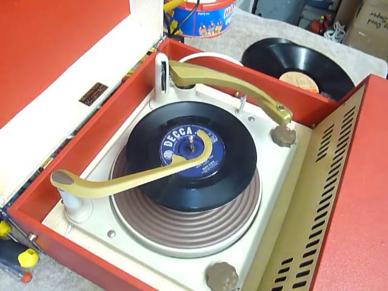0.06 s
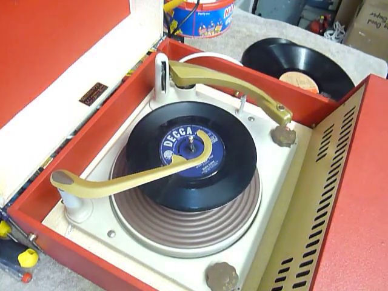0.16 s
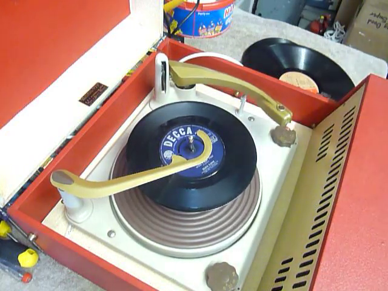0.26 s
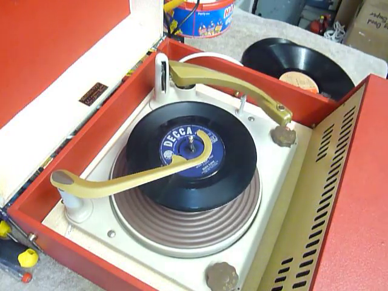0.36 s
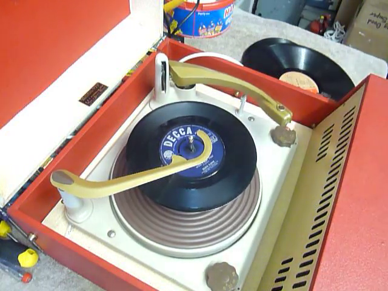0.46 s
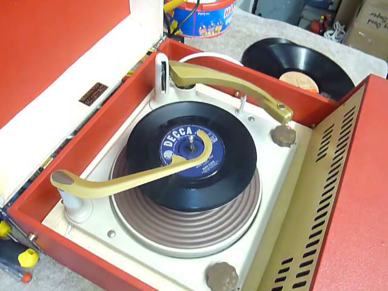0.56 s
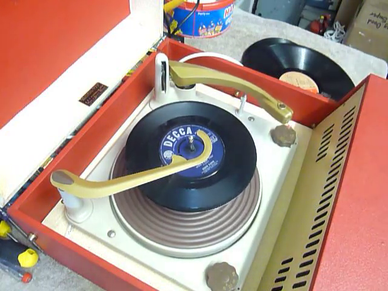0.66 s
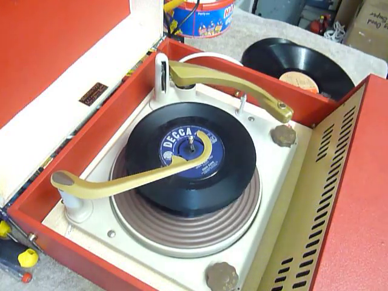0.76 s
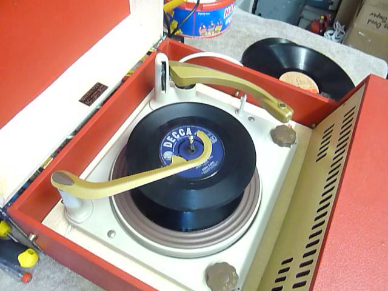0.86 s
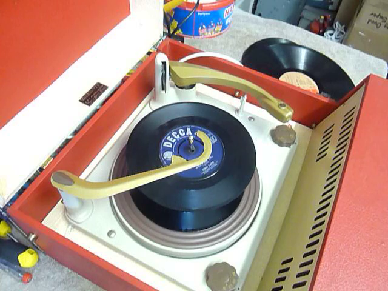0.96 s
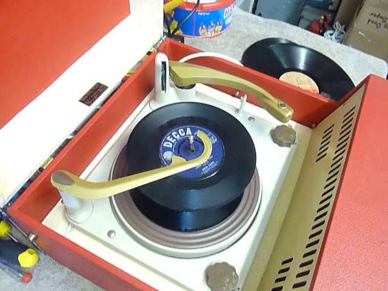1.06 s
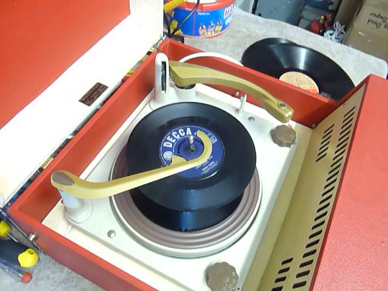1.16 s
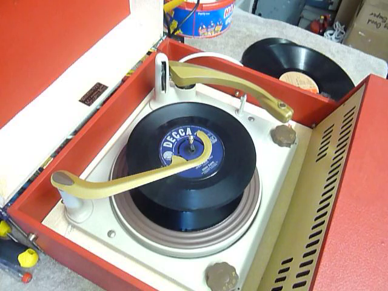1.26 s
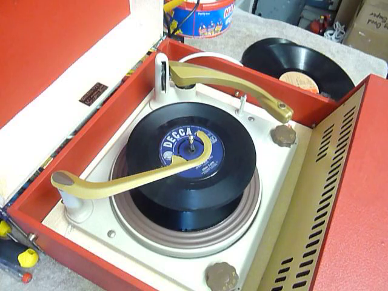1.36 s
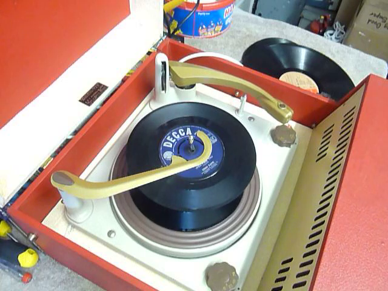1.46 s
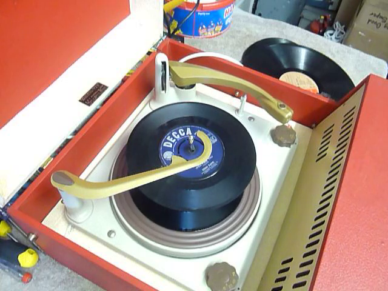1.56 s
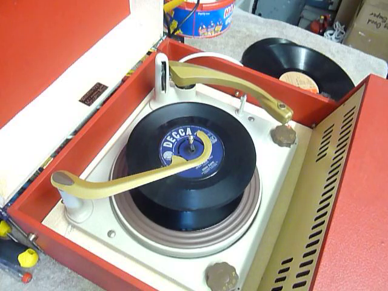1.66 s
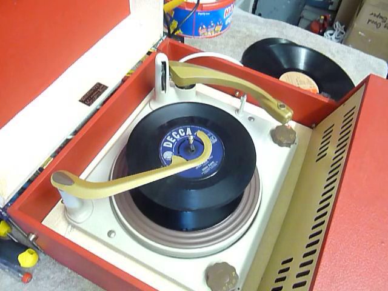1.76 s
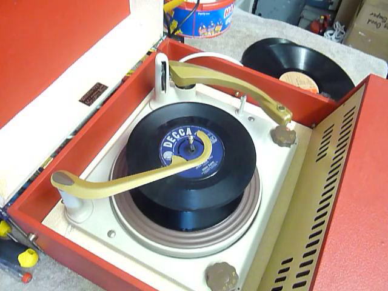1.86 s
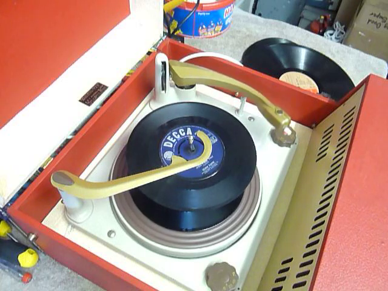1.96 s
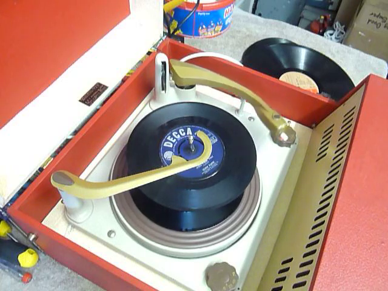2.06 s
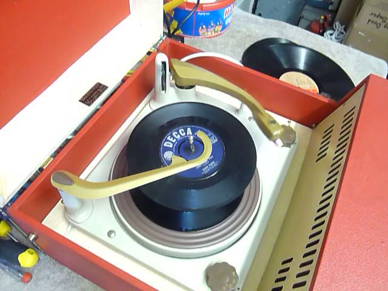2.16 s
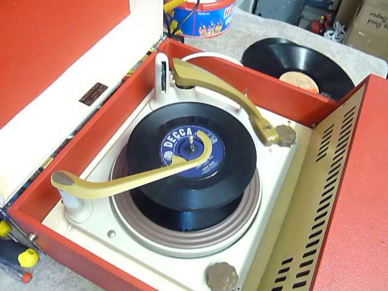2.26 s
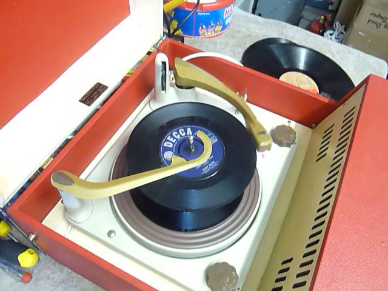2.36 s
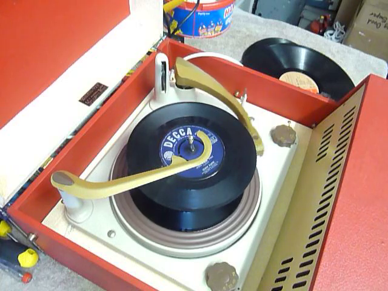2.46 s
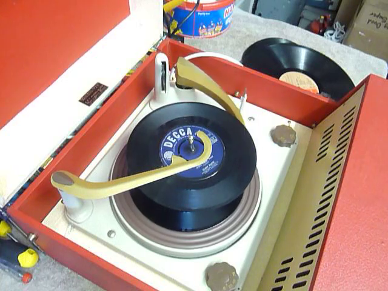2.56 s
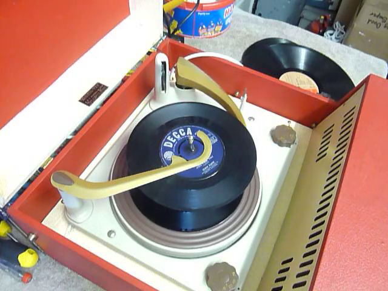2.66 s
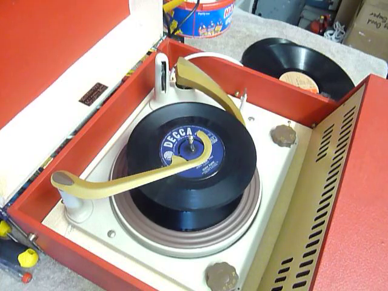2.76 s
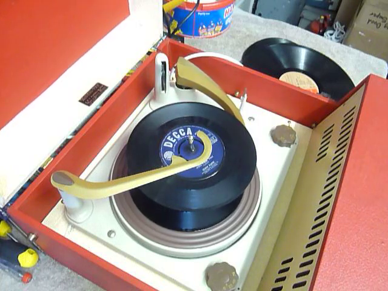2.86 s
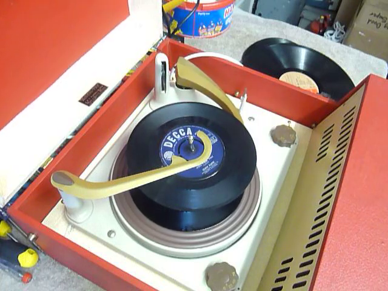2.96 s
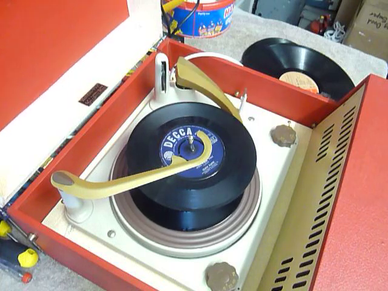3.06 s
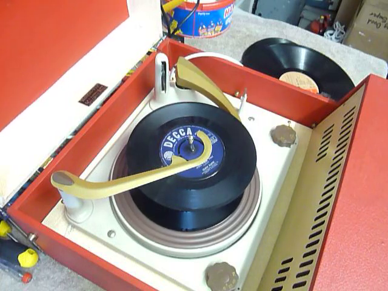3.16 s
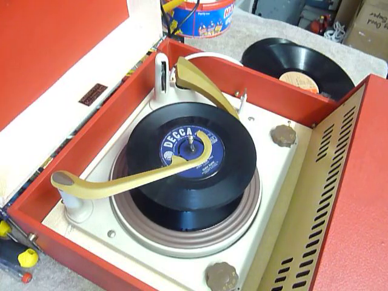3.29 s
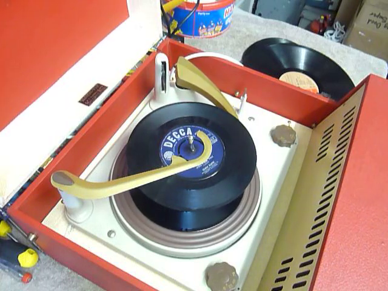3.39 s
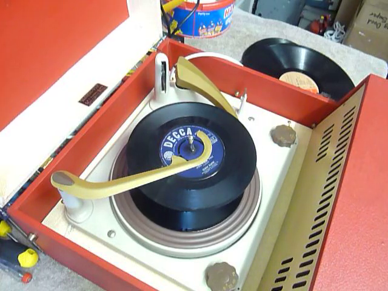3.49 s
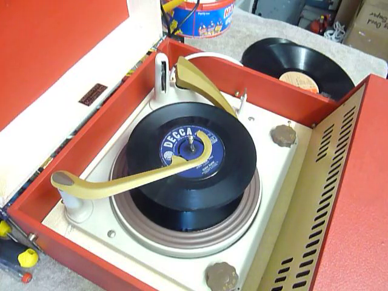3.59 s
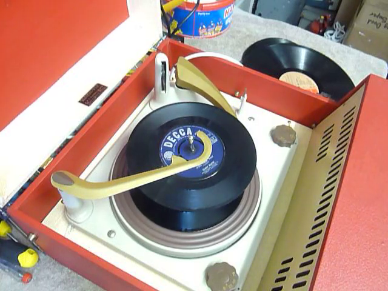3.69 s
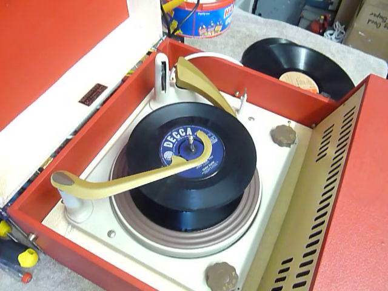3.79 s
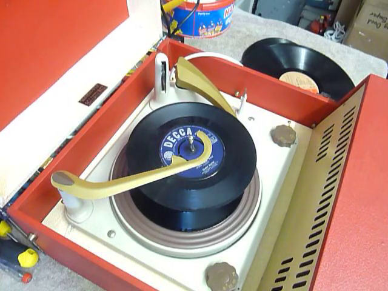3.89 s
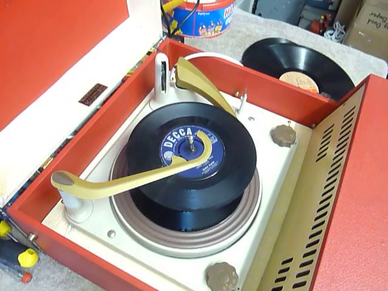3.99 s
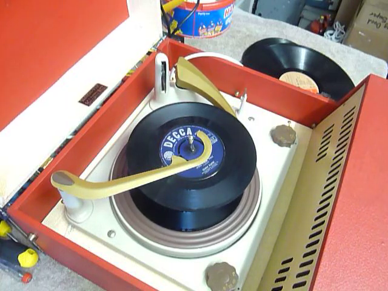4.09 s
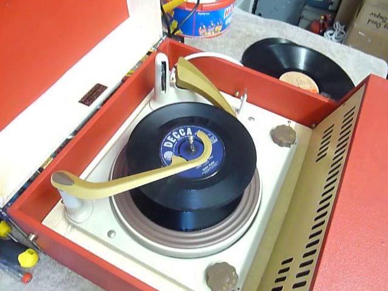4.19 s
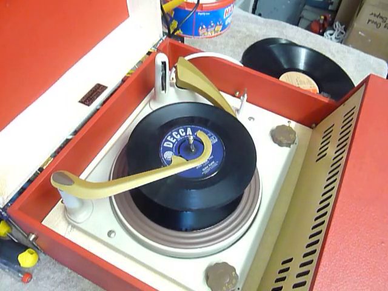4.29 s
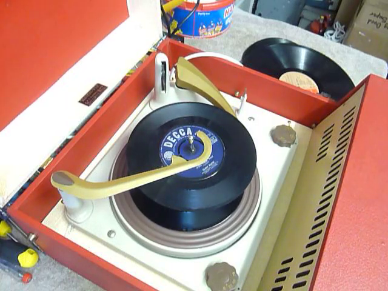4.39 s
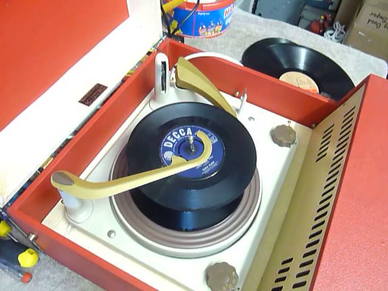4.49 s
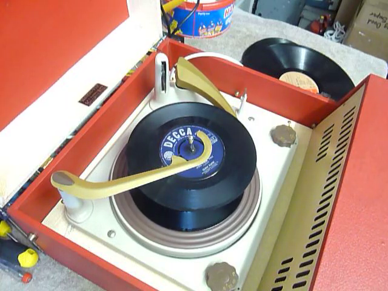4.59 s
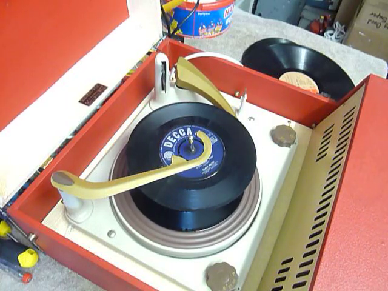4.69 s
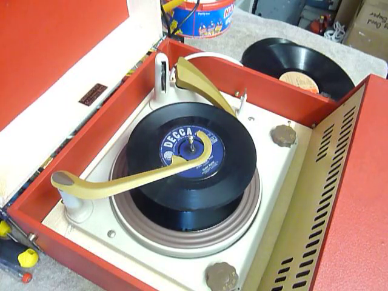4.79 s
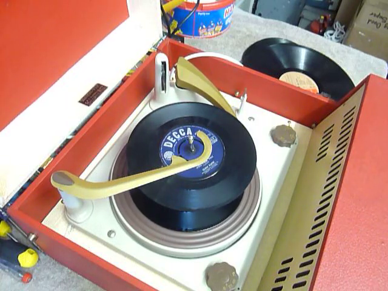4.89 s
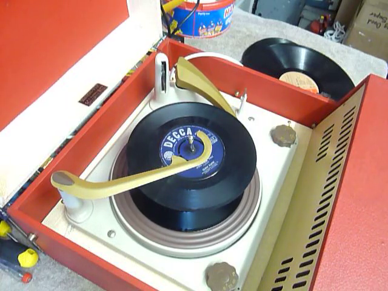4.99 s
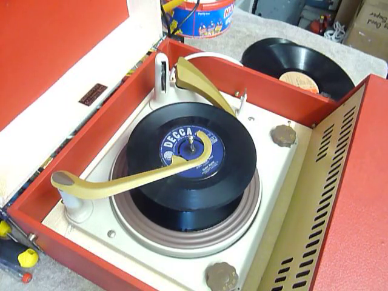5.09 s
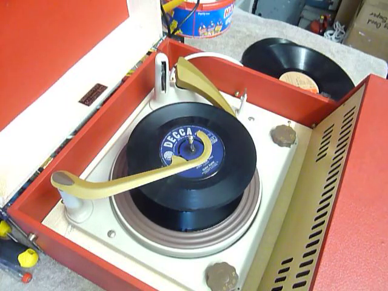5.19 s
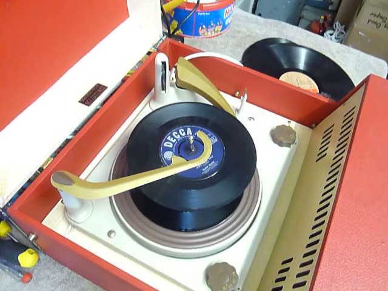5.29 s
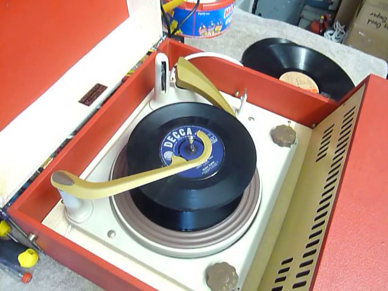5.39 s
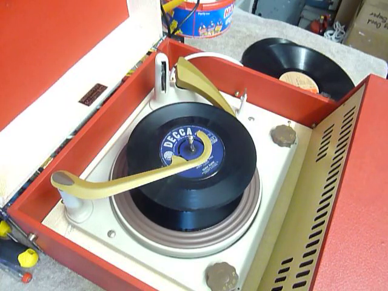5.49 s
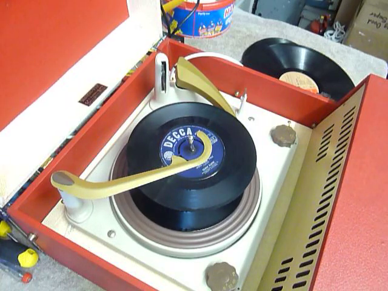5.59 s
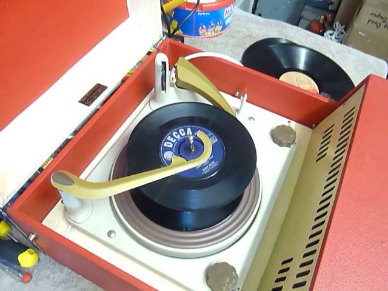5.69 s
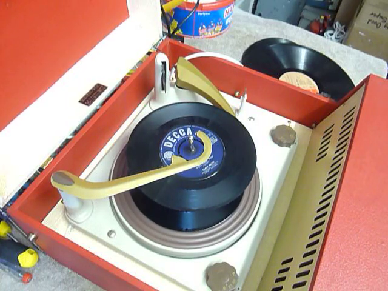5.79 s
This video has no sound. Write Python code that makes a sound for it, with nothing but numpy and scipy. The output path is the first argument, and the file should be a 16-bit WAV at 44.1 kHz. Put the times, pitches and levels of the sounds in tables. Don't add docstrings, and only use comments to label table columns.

```python
import sys
import numpy as np
from scipy import signal
from scipy.fft import rfft, irfft
from scipy.io import wavfile
from scipy.ndimage import uniform_filter1d

SR = 44100
rng = np.random.default_rng(int(sys.argv[2]) if len(sys.argv) > 2 else 0)


def inscribe(sig):
    pcm = np.round(np.clip(np.atleast_2d(sig).T, -1, 1) * 32767)
    wavfile.write(sys.argv[1], SR, pcm.astype(np.int16))


def voltage_ratio(level):
    return 10 ** (np.asarray(level, float) / 20)


N = 257984
SPAN = 8192

# pitch_hz, level_db
FLOOR_SPECTRUM = [(15, -40.5), (45, -25.5), (100, -18), (243, -16.5), (700, -26), (2000, -33),
                  (6500, -40.5), (9000, -30)]
FLOOR_RMS_DB = -54.5
# time_s, rise_db
CAM_LOAD = [(0, 4.5), (.4, 6), (.9, 4.5), (1.2, 3.5), (1.6, 5), (2.4, 4), (3.9, 5), (4.3, 3.3), (5.85, 3.8)]
# multiple of the mains, rms_db
HUM_PARTIALS = [(2, -69), (3, -57), (4, -64), (6, -71.5)]
MAINS_HZ = 49.86
# start_s, step_db
DIAPHRAGM_JOLTS = [
    (.871, -45),
    (2.081, -27),
]

# pitch_hz, level_db, t60_s
GEAR_TONES = [(920, 2, 0.039), (1120, -5, .018), (1170, 5, 0.037), (1450, -11, .014)]
FIRST_TOOTH_S, TOOTH_PERIOD_S, TEETH = 2.859, .0447, 13
HEAVIEST_DB, HEAVIEST_S, EASING_DB_PER_S = -41.5, 3.16, 16
# start_s, peak_db
PAWL_CATCHES = [
    (3.425, -38.5),
    (3.496, -48),
    (3.52, -42.5),
    (3.587, -45.5),
    (3.619, -49),
    (3.657, -48),
    (3.706, -47),
]

# start_s, peak_db, pitch_hz
PANEL_RINGS = [(.097, -42.5, 932), (.158, -40, 350), (.182, -36.5, 338), (.241, -27.5, 940),
               (.463, -33.5, 892), (.543, -25.5, 910), (.771, -40, 523), (.872, -36, 740),
               (.873, -31.5, 367), (1.700, -36, 1450), (1.701, -38.5, 350), (1.826, -37, 346),
               (2.081, -24, 830), (2.082, -29, 371), (2.744, -49, 800), (2.745, -41, 320),
               (2.776, -41, 860), (.768, -33.5, 1235), (1.826, -35.5, 1175), (2.743, -29.5, 1185),
               (2.775, -34, 1170), (4.199, -37, 1182), (1.642, -41, 1210), (3.854, -41.5, 864),
               (4.201, -37, 335), (5.467, -40, 896)]
# start_s, peak_db, pitch_hz
LEVER_RINGS = [(.151, -42.5, 4230), (.216, -54, 2880), (.228, -50, 3000), (.241, -23.5, 2980),
               (.256, -36, 2820), (.293, -47, 3430), (.340, -42, 2930), (.613, -30, 2900),
               (.655, -48, 2880), (.745, -41, 3320), (.771, -39, 2560), (.872, -18, 2000),
               (2.724, -58, 2270), (3.857, -46, 2340), (4.200, -45, 3070), (4.200, -49, 4140),
               (.152, -48, 5960), (.754, -34, 8000), (.772, -47, 5000), (.872, -23.5, 5640),
               (2.120, -43, 4660), (3.856, -42, 5950)]
# start_s, peak_db
DECK_RINGS = [
    (.280, -36),
    (0.342, -39.5),
    (.560, -37),
    (.611, -31.5),
    (0.657, -40.5),
    (.292, -42),
    (.625, -36),
    (2.082, -28),
    (2.797, -45.5),
]
DECK_HZ, DECK_T60_S = 1182, .1
PANEL_T60_S, PANEL_DAMP, LEVER_T60_S, LEVER_DAMP = 0.084, .1, 0.057, 0.36
ENGAGED_S, ENGAGED_SHARE = 1.2, .65

# low_hz, high_hz, ring_s, tail_db, tail_t60_s
CROWDED_BODIES = [
    (715, 2235, 0.0044, -9, 0.12),
    (269, 920, 0.01, -11.5, 0.27),
    (1806, 5230, 0.0014, -14.5, 0.16),
    (4290, 9060, 0.00029, -16, 0.2),
]
# start_s, deck_peak_db, case_share_db, hardness_db, chatter_s
KNOB_TURN = [(.095, -54, 3, -13, .0027), (0.15, -32.5, -4, -4.5, .002), (0.156, -38.5, -27, -26, 0.003),
             (.181, -42, -10, -2, 0.0031), (0.239, -25.5, -1, 1, 0.0092), (.281, -42.5, -1, 1, 0.0098),
             (.293, -38.5, -24, 1, 0.0049), (.305, -53, 2, -11, .004), (0.342, -40, -4, -3.5, 0.002),
             (.445, -41, -31, -24, .0012), (.458, -33.5, -2.5, 8.5, 0.0042),
             (.465, -28.5, -4.5, -2.5, .0054)]
# start_s, deck_peak_db, case_share_db, hardness_db, chatter_s
LATCH_CLOSING = [(.534, -33, -5, -3, 0.0042), (.542, -23.5, -3.5, -2, 0.0076), (.556, -32.5, -1, 5, .006),
                 (.579, -34, -7, -21, .0014), (0.6102, -23.5, -6.5, -12, .003),
                 (0.626, -31.5, -8, -28, 0.0052), (.656, -46.5, 5, 3, .0013),
                 (.743, -37.5, 4, -0.5, 0.0038), (.753, -35, -2, 1, 0.0028), (.762, -41, -1, -10, .003),
                 (.771, -40, 3.5, -8, 0.0027), (0.784, -44, 6, -12, .004), (0.798, -35, -7, -14, .0018),
                 (.836, -49, 8, -11, .003), (.865, -20, -5.5, 0.5, 0.00079),
                 (.871, -12.5, -15, -2.5, 0.00048), (.877, -39, -7, 15.5, .0012), (.886, -44, 3, -2, .006)]
# start_s, deck_peak_db, case_share_db, hardness_db, chatter_s
CAM_CYCLE = [(1.544, -65, 19.5, -7, .0027), (1.641, -39, -17, -9, 0.00068), (1.699, -36.5, 0, -20, 0.0022),
             (1.824, -30.5, -14, -10, 0.0023), (1.909, -46, -29, -24, 0.0032),
             (1.965, -48, -21, -35, 0.0048), (2.587, -57.5, 14, -13, 0.0021),
             (2.724, -40.5, -14, -33, 0.0023), (2.741, -32, -7.5, -16, 0.0012), (2.769, -38, 1, -9, .004),
             (2.774, -35, -4.5, -3.5, 0.006), (3.741, -48, -17, -2, .0045), (3.853, -44, -20, 8, 0.0033),
             (3.855, -36, -10, 3, 0.0096), (4.199, -44, 7, -16, .0011)]
# start_s, deck_peak_db, case_share_db, hardness_db, chatter_s
RECORD_DROP = [
    (2.079, -17, -12.5, 5, 0.0037),
    (2.097, -52, -11, 20, 0.0035),
    (2.119, -35, -19, 1, 0.0037),
    (2.138, -38.5, -32, -4, 0.0053),
]
LEVER_DB, DROP_LEVER_DB, LEVER_SHARE = 3.5, -0.5, 0.61

# pitch_hz, gain_db
TOP_CUT = [(5500, 1.5), (6600, 2), (7200, -4.5), (7800, -9), (8400, -20.5), (8900, -36.5), (9150, -67.5),
           (9600, -150)]
OFFSET = .0069


def peak(x, db):
    return x * voltage_ratio(db) / np.abs(x).max()


def band(x, lo_hz, hi_hz):
    return signal.sosfilt(signal.butter(2, [lo_hz, hi_hz], "bandpass", fs=SR, output="sos"), x)


def held_noise(count, hold, smooth):
    return uniform_filter1d(np.repeat(rng.standard_normal(count), hold), smooth)


def walk(rate_hz):
    hold = int(SR / rate_hz)
    return 0.86 * uniform_filter1d(held_noise(N // hold + 1, hold, hold), hold)[:N]


def decay(t, t60_s):
    return np.exp(-np.log(1000) * t / t60_s)


def ring(modes, chance, spread_db=6.5, detune=0.021):
    hz, db, t60_s = np.transpose(modes)[:, :, None]
    t = np.arange(SPAN) / SR
    count = len(modes)
    pitch_hz = hz * (1 + detune * chance[:count, None])
    gain = voltage_ratio(db + spread_db * chance[count:2 * count, None])
    return (gain * np.sin(2 * np.pi * pitch_hz * t) * decay(t, t60_s)).sum(axis=0)


def add(out, start_s, x):
    i = int(start_s * SR)
    out[i:i + len(x)] += x[:len(out) - i]


def rumble():
    hz, db = np.transpose(FLOOR_SPECTRUM)
    f = np.maximum(np.arange(N // 2 + 1) * SR / N, 1)
    spectrum = rfft(rng.standard_normal(N)) * voltage_ratio(np.interp(np.log(f), np.log(hz), db))
    spectrum *= voltage_ratio(FLOOR_RMS_DB) / irfft(spectrum, N).std()
    middle = np.exp(-(np.log2(f / 900) / 1.73) ** 2)
    load_db = np.interp(np.arange(N) / SR, *np.transpose(CAM_LOAD))
    steady = irfft(spectrum * (1 - middle), N)
    return steady + irfft(spectrum * middle, N) * voltage_ratio(load_db + 1.1 * walk(22))


def motor():
    turns = MAINS_HZ * np.arange(N) / SR
    out = np.zeros(N)
    for k, rms_db in HUM_PARTIALS:
        level = voltage_ratio(rms_db + .6 * walk(4)) * np.sqrt(2)
        out += level * np.cos(2 * np.pi * (k * turns - 0.1195 * k * k))
    return out


def jolts():
    out, t = np.zeros(N), np.arange(SR // 2) / SR
    step = (1 - np.exp(-t / 0.0016)) * (1 - t / 0.048) * np.exp(-t / 0.044)
    for start_s, step_db in DIAPHRAGM_JOLTS:
        add(out, start_s, voltage_ratio(step_db) * step)
    return out


def gear():
    out, slop = np.zeros(N), rng.standard_normal((TEETH, 2))
    times = FIRST_TOOTH_S + TOOTH_PERIOD_S * np.arange(TEETH) + .0015 * slop[:, 0]
    levels = HEAVIEST_DB - EASING_DB_PER_S * np.abs(times - HEAVIEST_S) + 0.99 * slop[:, 1]
    for start_s, db in [*zip(times, levels), *PAWL_CATCHES]:
        tones = ring(GEAR_TONES, rng.standard_normal(8), spread_db=1.5, detune=.015)
        tick = np.convolve(np.hanning(14), tones)
        add(out, start_s, peak(tick, db))
        add(out, start_s + 0.00456, peak(tick, db - 9))
    return out


def pings(parts, part_t60_s, damp):
    out, t = np.zeros(N), np.arange(SPAN) / SR
    for start_s, db, hz in parts:
        t60_s = part_t60_s * voltage_ratio(-damp * (db + 40)) * (ENGAGED_SHARE if start_s > ENGAGED_S else 1)
        t60_s = np.clip(t60_s, .015, .12)
        modes = [(hz, 0, t60_s), (1.07 * hz, -9, 0.4 * t60_s), (.92 * hz, -11, 0.75 * t60_s)]
        stumble = held_noise(SPAN // 64, 64, 64) * (1 - np.exp(-t / 0.0047))
        free = ring(modes, np.zeros(6)) * (1 - np.exp(-t / 0.00043)) * voltage_ratio(-7.0 * np.abs(stumble))
        add(out, start_s, peak(np.convolve(np.hanning(8), free), db))
    return out


def rings():
    out = pings(PANEL_RINGS, PANEL_T60_S, PANEL_DAMP)
    out += pings(LEVER_RINGS, LEVER_T60_S, LEVER_DAMP)
    return out + pings([(s, db, DECK_HZ) for s, db in DECK_RINGS], DECK_T60_S, 0)


def contacts():
    out, t = np.zeros(N), np.arange(SPAN) / SR
    rows = [(*row, LEVER_DB) for row in KNOB_TURN + LATCH_CLOSING + CAM_CYCLE]
    rows += [(*row, DROP_LEVER_DB) for row in RECORD_DROP]
    for start_s, deck_db, case_db, hard_db, chatter_s, lever_db in rows:
        levels = deck_db + np.array([0, case_db, lever_db + LEVER_SHARE * hard_db, hard_db])
        swarm, scatter = rng.standard_normal((2, SPAN))
        force = swarm * np.abs(swarm) ** .3 * (1 - np.exp(-t / (.3 * chatter_s)))
        force *= (1 + .9 * np.exp(-t / .003)) * (1 - np.exp(-t / .0006))
        rattle = voltage_ratio(2.2 * held_noise(SPAN // 128, 128, 64))
        diffuse = scatter * np.abs(swarm) ** 0.58 * rattle * (1 - np.exp(-t / 0.002))
        for (lo_hz, hi_hz, ring_s, tail_db, t60_s), db in zip(CROWDED_BODIES, levels):
            blow = band(force * np.exp(-t / (chatter_s + ring_s)), lo_hz, hi_hz)
            tail = band(diffuse * decay(t, t60_s), lo_hz, hi_hz)
            add(out, start_s, peak(blow, db) + peak(tail, db + tail_db))
    return out


def scene():
    background = rumble() + motor() + jolts()
    strikes = gear() + rings() + contacts()
    strikes = band(band(strikes, 250, 9000), 250, 9000)
    return (background + strikes)[None]


def low_pass(x):
    return signal.sosfilt(signal.butter(12, 9000, fs=SR, output="sos"), x)


def record(dry):
    hz, db = np.transpose(TOP_CUT)
    cut = voltage_ratio(np.interp(np.arange(N // 2 + 1) * SR / N, hz, db))
    headroom = .36
    rounded = headroom * np.tanh(dry / headroom)
    mix = irfft(rfft(rounded) * cut, N) + OFFSET
    return low_pass(mix)


dry = scene()
out = record(dry)
inscribe(out)
```